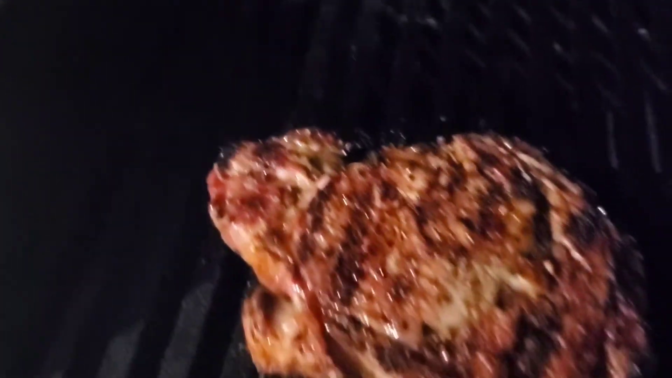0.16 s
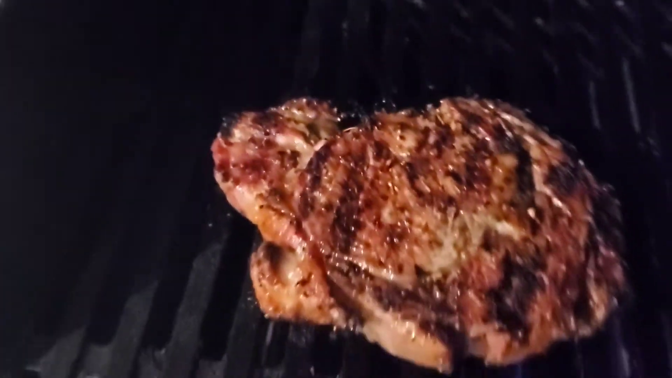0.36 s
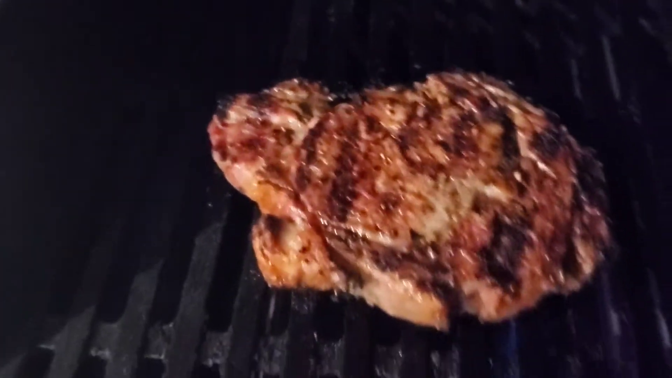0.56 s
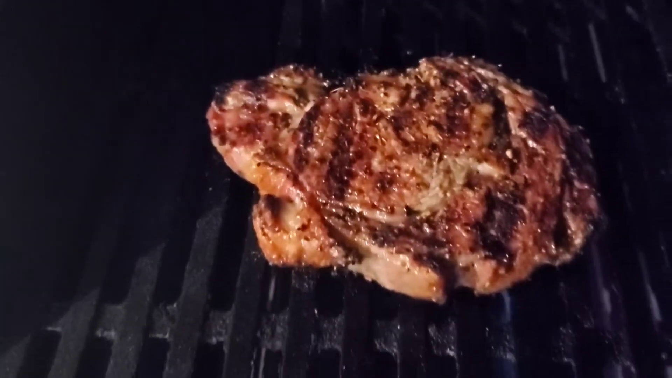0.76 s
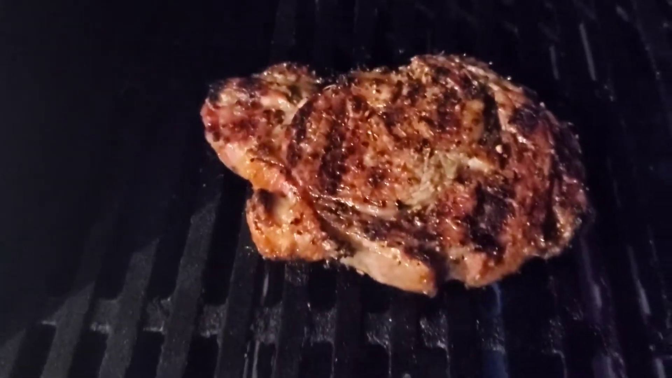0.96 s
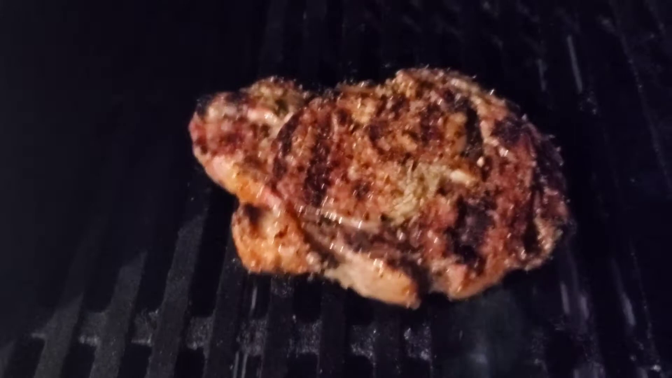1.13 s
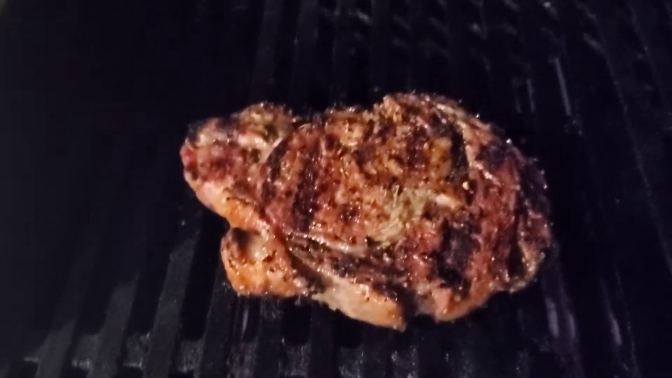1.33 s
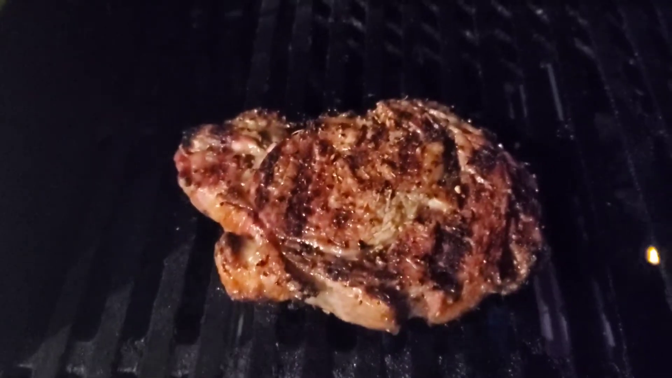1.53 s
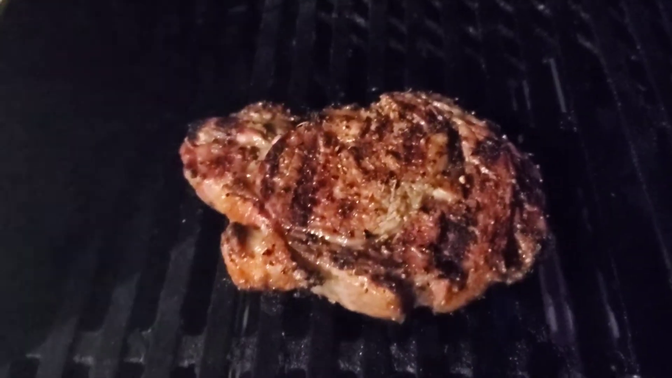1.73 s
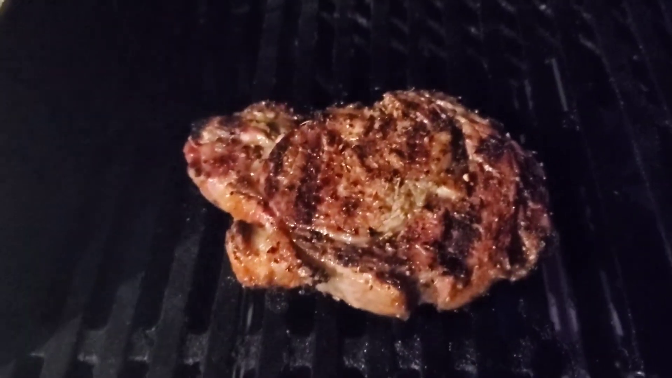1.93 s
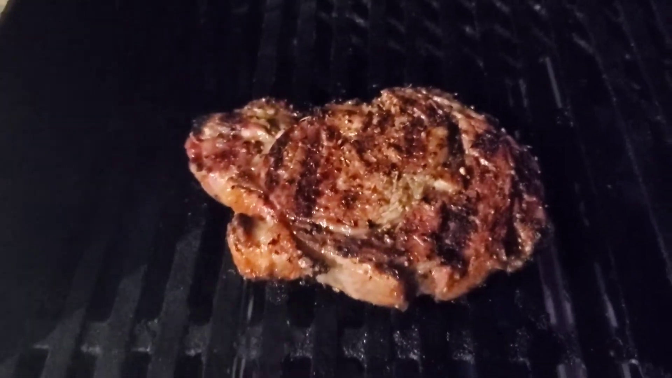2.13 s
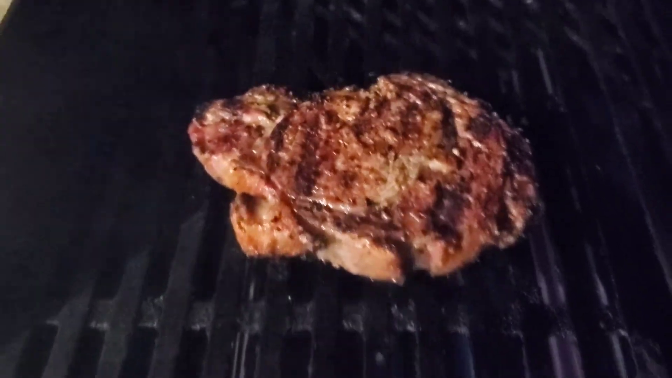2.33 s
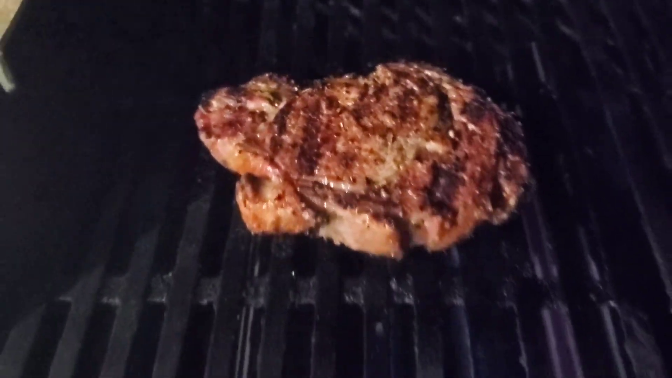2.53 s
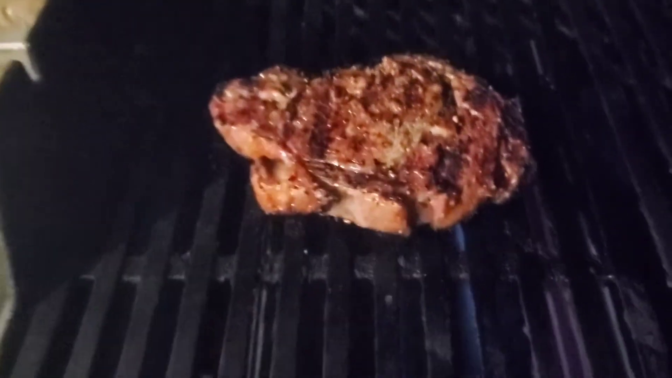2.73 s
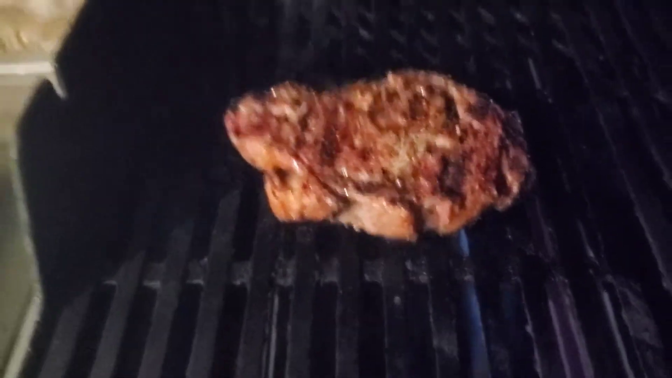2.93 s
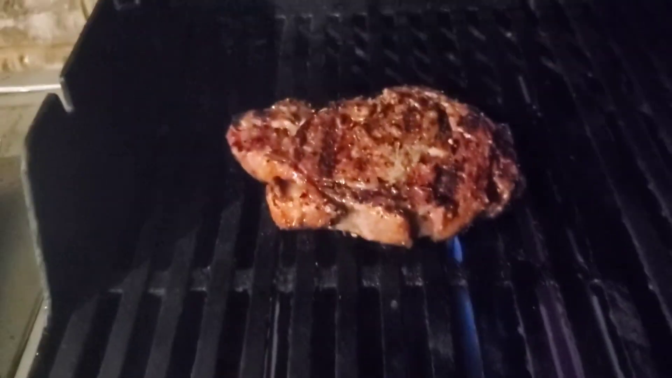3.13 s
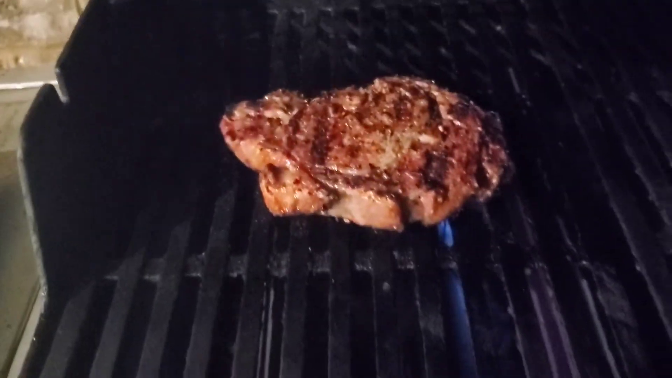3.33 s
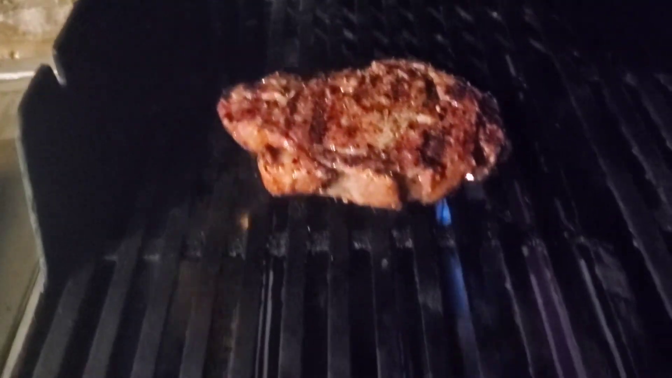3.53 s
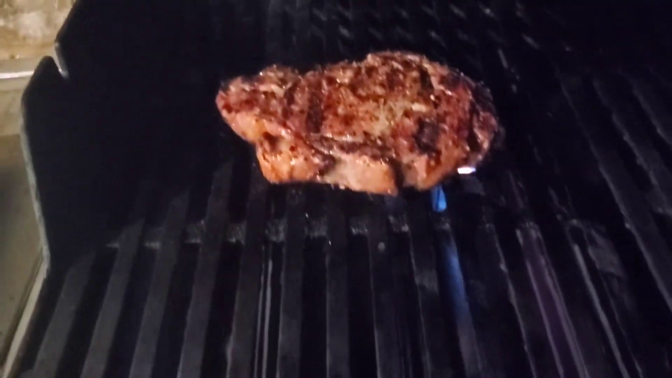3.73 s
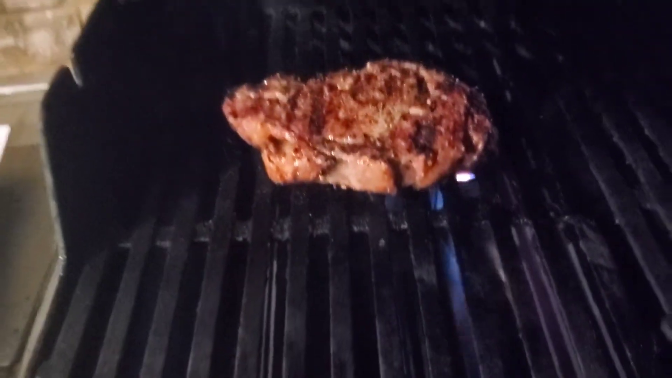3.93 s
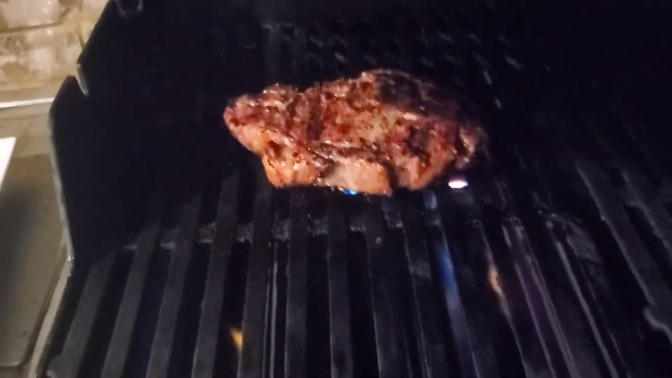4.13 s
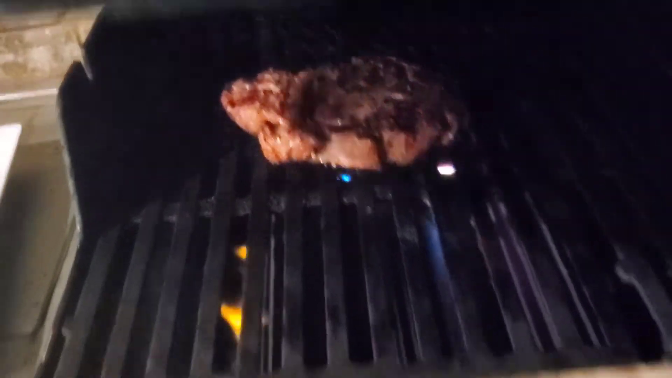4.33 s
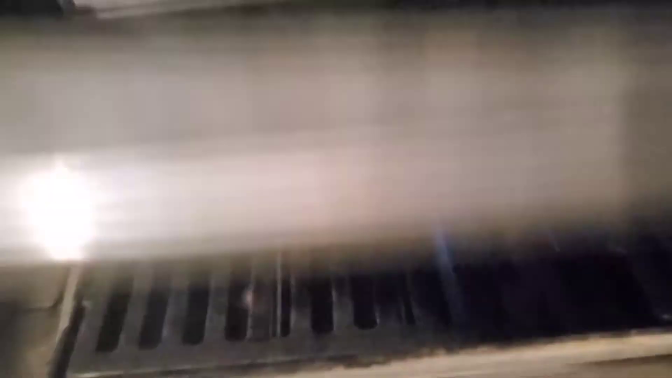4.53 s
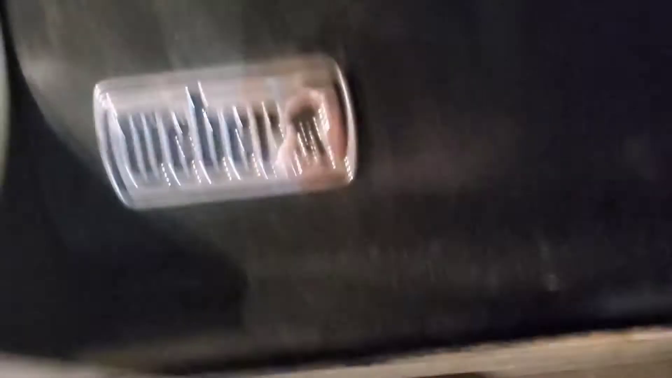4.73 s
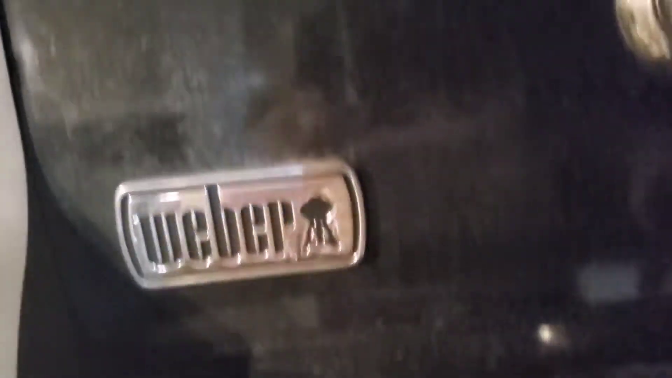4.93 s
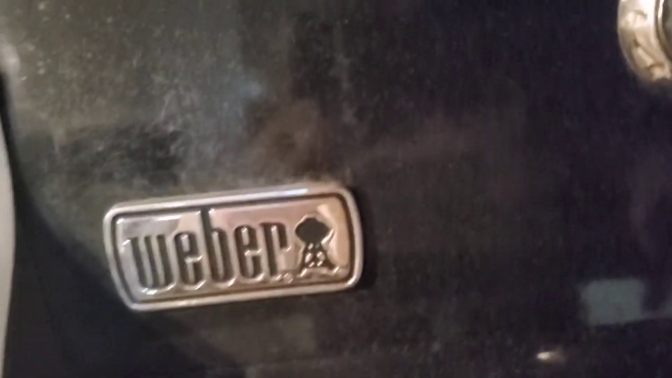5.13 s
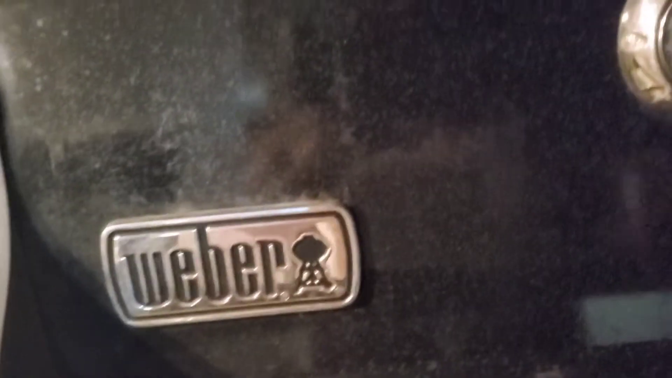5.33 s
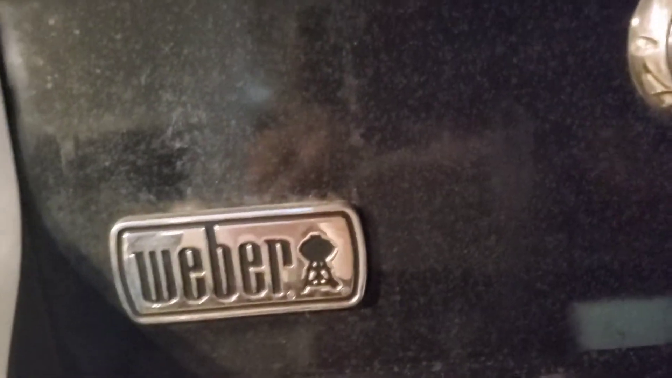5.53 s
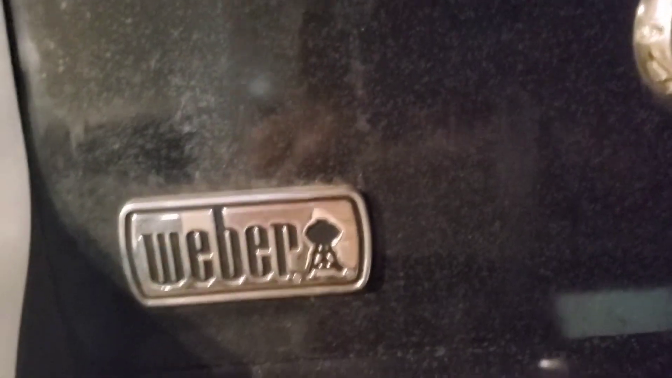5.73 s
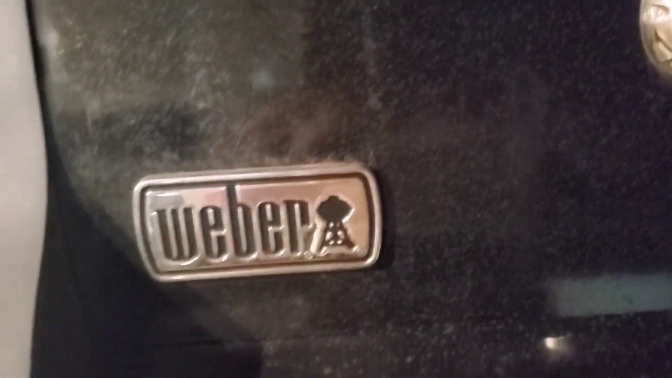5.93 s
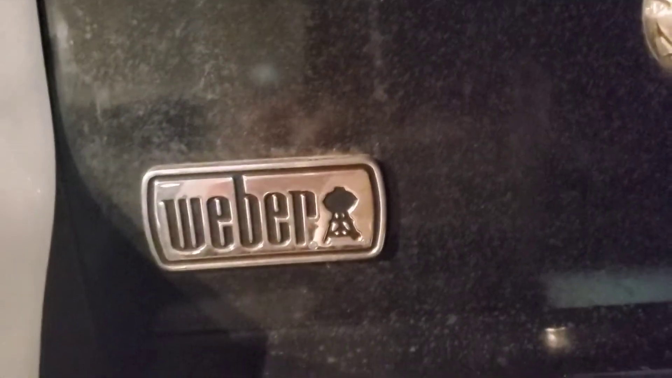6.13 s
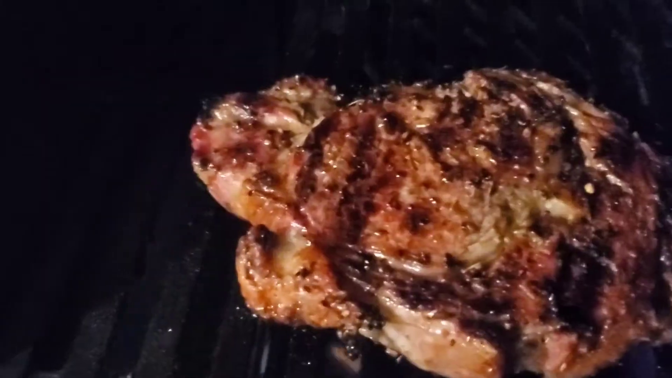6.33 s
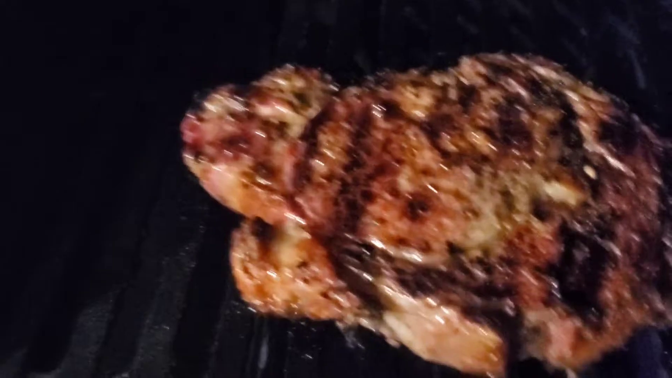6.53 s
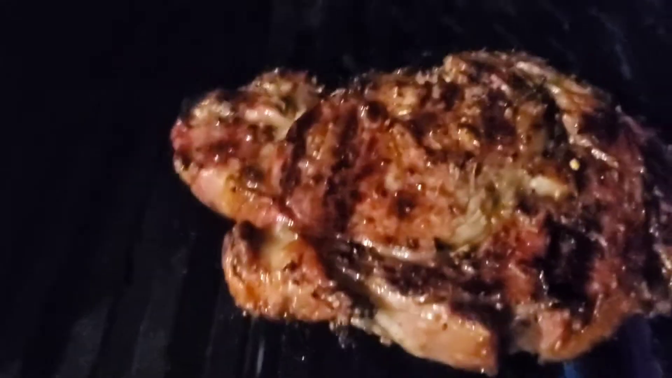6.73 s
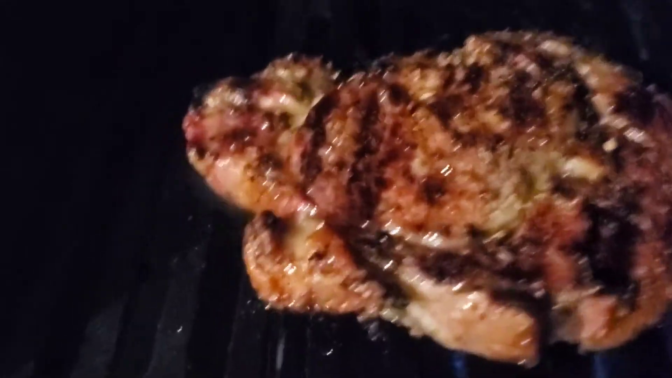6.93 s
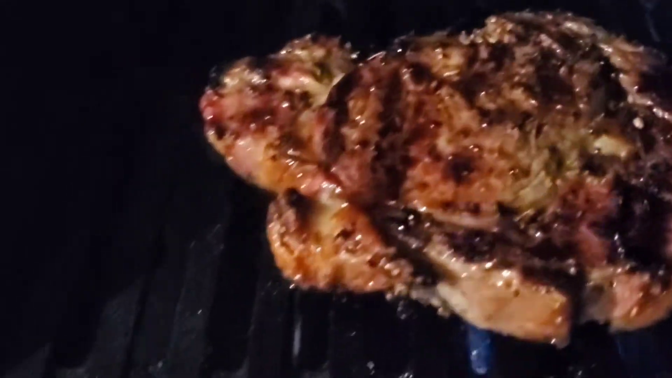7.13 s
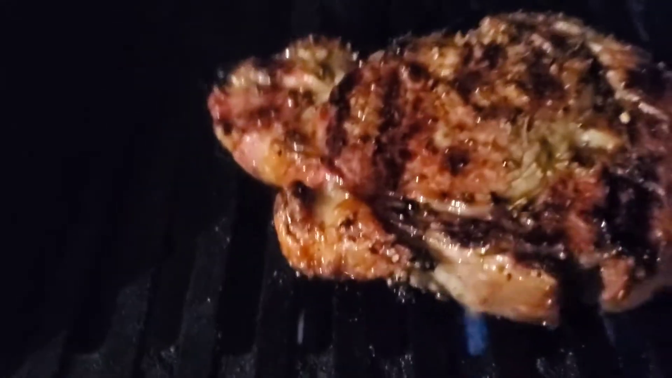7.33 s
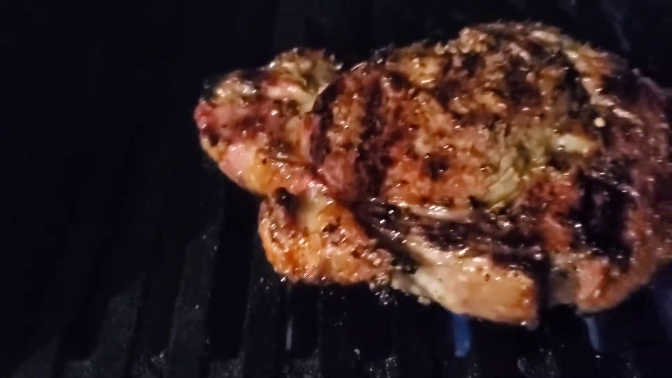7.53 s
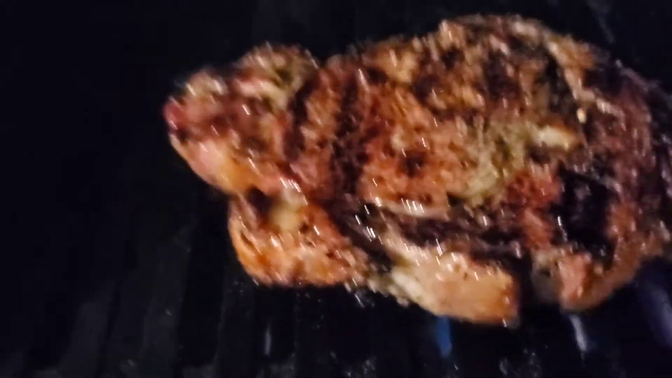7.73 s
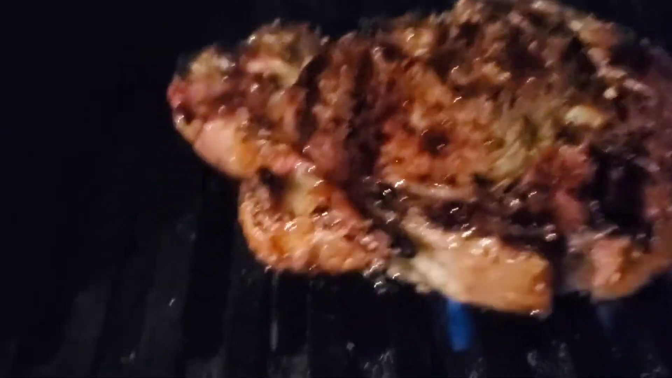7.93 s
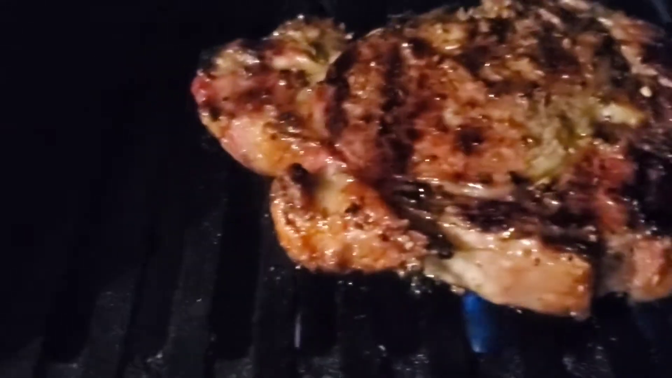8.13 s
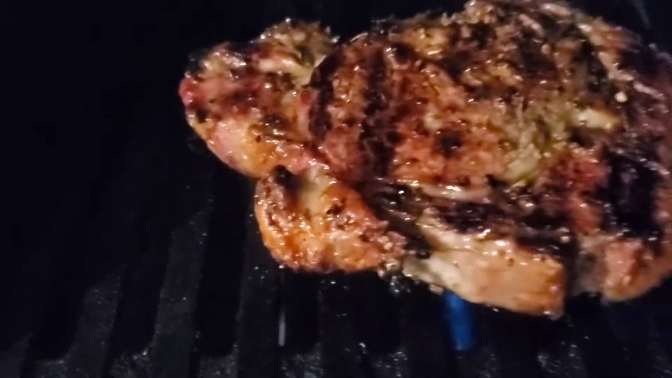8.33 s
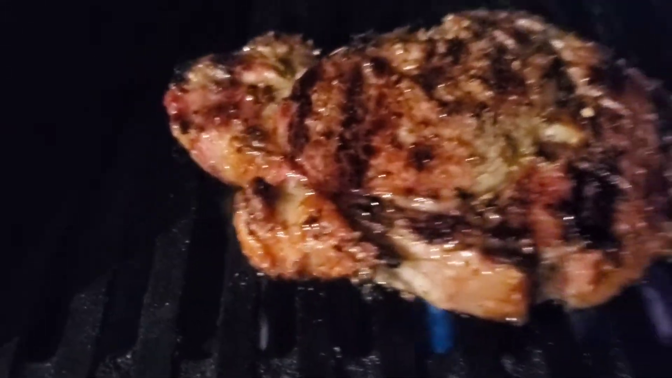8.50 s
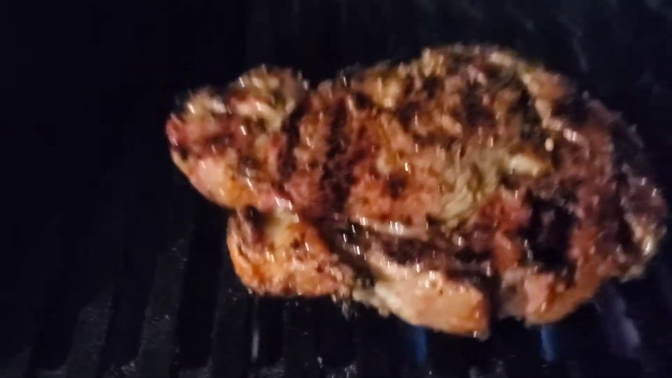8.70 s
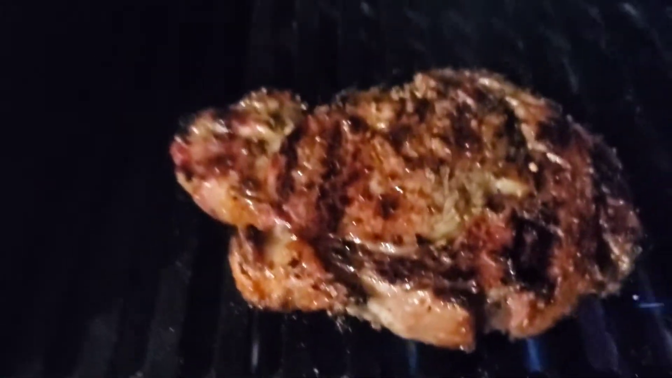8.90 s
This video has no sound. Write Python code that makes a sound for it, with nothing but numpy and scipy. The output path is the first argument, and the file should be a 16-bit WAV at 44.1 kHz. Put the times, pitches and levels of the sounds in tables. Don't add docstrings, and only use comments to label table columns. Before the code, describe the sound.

Crisp fat crackles over droning gas burners, a metal lid bangs and rattles, the sizzle goes faint, then returns nearer with tong scrapes.

```python
import sys
import numpy as np
from scipy import signal
from scipy.fft import rfft, irfft, next_fast_len
from scipy.io import wavfile
from scipy.ndimage import uniform_filter1d

SR = 44100
rng = np.random.default_rng(int(sys.argv[2]) if len(sys.argv) > 2 else 0)


def wav_record(signal):
    frames = np.transpose(np.atleast_2d(signal))
    bounded = np.clip(frames, -1, 1)
    quanta = np.round(bounded * 32767).astype(np.int16)
    wavfile.write(sys.argv[1], SR, quanta)


def decibels_to_gain(level_db):
    exponent = np.asarray(level_db, float) / 20
    return 10 ** exponent


N = 395136
T = np.arange(N) / SR
TOP_HZ = 15780
SILENCE_S = (6.151, 6.1915)

# time in [s], level in [dB].
HEAT = [(0, -32), (1.37, -32), (1.6, -32.5), (2.5, -33.5), (3.1, -34.5), (4.28, -36), (6.17, -33.5),
        (6.19, -33.5), (6.27, -29.5), (6.82, -30), (7.32, -31), (7.66, -31.5), (7.92, -33.5), (8.36, -31),
        (8.62, -32), (8.96, -32.5)]
# time in [s], shut share in [0-1].
SHUT = [
    (4.28, 0),
    (4.49, 0.13),
    (4.72, 0.65),
    (4.93, 0.63),
    (5.2, 0.98),
    (6.17, 1),
    (6.18, 0.02),
]
# far level re heat in [dB], near level re heat in [dB], change through the hood in [dB].
BUBBLES = [
    (-22.5, -26, -10.5),
    (-7, -8.5, -17),
    (0, 1, -19),
]


def level(x, db=0):
    return x * decibels_to_gain(db) / np.sqrt(np.mean(x ** 2))


def curves(spans):
    s, *columns = np.concatenate(spans).T
    return [np.interp(T, s, c) for c in columns]


def bumps(rows):
    return sum(db * np.exp(-((T - s) / half_s) ** 2) for s, db, half_s in rows)


def near():
    return T > np.mean(SILENCE_S)


def colour(x, lo_hz, hi_hz, shape=((1, 0), (2, 0)), skirt=0.19):
    size = next_fast_len(x.shape[-1])
    octave = np.log2(np.arange(size // 2 + 1) * SR / size + 1)
    edge = np.minimum(octave - np.log2(lo_hz), np.log2(hi_hz) - octave) / skirt
    passed = np.sin(np.pi / 4 * (1 + np.clip(edge, -1, 1)))
    hz, db = np.array(shape).T
    tint = decibels_to_gain(np.interp(octave, np.log2(hz), db))
    return irfft(rfft(x, size) * tint * passed, size)[..., :x.shape[-1]]


def ring(x, hz, t60_s):
    pole = np.exp(2j * np.pi * hz / SR - np.log(1000) / (t60_s * SR))
    return signal.lfilter([1], [1, -pole], x).imag


def walk(rate_hz):
    k = int(SR / rate_hz)
    held = np.repeat(rng.standard_normal(N // k + 1), k)
    steps = uniform_filter1d(uniform_filter1d(held, k), k)[:N]
    return level(steps - uniform_filter1d(steps, size=3 * k))


def pair(alike, size=N):
    mid, side = rng.standard_normal((2, size))
    alike = np.clip(alike, -1, 1)
    opposed = side * np.array([[1], [-1]])
    return (np.sqrt(1 + alike) * mid + np.sqrt(1 - alike) * opposed) / np.sqrt(2)


def pan(db):
    return decibels_to_gain(np.array([db, -db]) / 2)


def add(out, sound, s):
    i = int(s * SR)
    out[:, i:i + sound.shape[-1]] += sound[..., :N - i]


def sizzle():
    # frequency in [Hz], density in [dB per Hz].
    fat = [(290, -56), (500, -30), (586, -13.5), (804, -15), (970, -21.5), (1260, -12.5), (1430, -15),
           (2170, -17), (2730, -14.5), (4460, -14.5), (7070, -8.5), (9290, -9), (11500, 0), (14900, 4),
           (15600, 9)]
    # time in [s], bright change in [dB], deep change in [dB], half length in [s].
    surges = [(.26, 1, -3, 0.045), (0.335, -0.5, 7, 0.022), (.37, 1.5, -2, .02), (0.462, -1.5, -3.5, 0.051),
              (0.474, 3, 1, 0.0096), (0.684, -1.5, -2, 0.11), (0.712, 3, 2, 0.027), (1.606, -2, 1, 0.11),
              (1.698, 4, 1, 0.027), (1.78, -1, 6, 0.022), (2.56, 3, 4, 0.015), (2.596, -1.5, 1, 0.017),
              (2.69, 3.5, 4.5, .03), (3.14, -2, -1, 0.033), (3.212, -0.5, -1, 0.045), (3.315, 0.5, 3, 0.13),
              (3.544, 2.5, -0.5, 0.078), (5.95, 2.5, 4, .015), (6.274, 2.5, 7.5, 0.023),
              (7.446, 2.5, 6, 0.033), (7.74, 2.5, 9, 0.016), (6.513, -0.5, -2, 0.017), (6.704, 2, 1, .04),
              (6.948, 1, -3, .04), (6.999, -2, 0, 0.037), (7.09, 1.5, -1.5, 0.043), (8.33, 0, -1.5, 0.062),
              (8.49, -1, 3, 0.058), (8.546, -0.5, -0.5, .02), (8.603, 6, 5, 0.0094)]
    # time in [s], change in [dB], half length in [s].
    fizz = [(6.82, 7, .03), (6.95, 3.5, .03), (7.01, -4, .025), (7.1, 1, .05), (7.27, 4, .015),
            (7.4, 7, .03), (7.58, 1.5, .04), (7.67, 0, .03), (7.78, 1.5, .04), (7.91, -4, .04),
            (8.05, -6, .04), (8.3, 4, 0.066), (8.46, -1, .04), (8.55, 3, .02), (8.7, 0, .05)]
    # frequency in [Hz], change in [dB].
    muffle = [(800, 2), (1900, -3.5), (2700, 2), (3700, -1), (5000, 1.5), (8000, -0.5), (14000, -2)]
    # time in [s], finest fizz in [dB], the rest in [dB].
    lean = [(0, -2, 0.52), (1.54, 2, 0.93), (2.05, -3, 0.66), (2.87, 2.5, 0.4), (4.21, 1.5, 0.27),
            (4.57, -4, -1.1), (5.56, -2, 0.87), (6.14, -6, 0), (6.2, 2, 0), (6.86, 4, -0.84),
            (6.94, 11, .5), (7.6, 5, -0.16), (7.8, 13, 1), (8.05, -1, -1), (8.2, 0, -0.069),
            (8.96, -1, 0.29)]
    (heat_db,), (shut,) = curves([HEAT]), curves([SHUT])
    fizz_pan_db, body_pan_db = curves([lean])
    fizz_db = bumps(fizz)
    bright_db, deep_db = (bumps(np.array(surges)[:, [0, k, 3]]) for k in (1, 2))

    when, size, pitch = rng.random((6000, 3)).T
    start = (when * N).astype(int)
    flurry = .7 * walk(22) + .7 * walk(60)
    power = decibels_to_gain(2 * (0.83 * np.minimum(-np.log(size), 3.5) + 0.45 * flurry[start]))

    groups = [(deep_db, [670, 965, 1520, 2196], .6),
              (bright_db, [2413, 3000, 4382, 5600, 7270, 8340], .35),
              (bright_db, [8740, 10800, 14200, 15580], .3)]
    out = 0
    for (far_db, near_db, hood_db), (surge_db, edges_hz, steady) in zip(BUBBLES, groups):
        group = 0
        for lo, hi in zip(edges_hz, edges_hz[1:]):
            centre_hz = np.sqrt(lo * hi)
            reach = np.exp(-((np.log2(centre_hz / 1500) - 4.0 * pitch) / 1.6) ** 2)
            bursts = np.bincount(start, power * reach, N)
            bursts = signal.lfilter([1], [1, -np.exp(-1 / (0.0045 * SR))], bursts)
            bursts = bursts / uniform_filter1d(bursts, size=9000)
            swell = np.sqrt(steady + (1 - steady) * bursts) * decibels_to_gain(0.5 * walk(15) + 0.066 * flurry)
            finest = lo > 13000
            flare = 1 if finest else 0.45 * (lo > 10000)
            muffle_db = np.interp(centre_hz, *np.transpose(muffle)) * shut
            place = pan(fizz_pan_db if finest else body_pan_db) * decibels_to_gain(muffle_db + fizz_db * flare)
            group = group + colour(level(swell) * place * pair(250 / lo), lo, hi, fat)
        group_db = heat_db + surge_db + np.where(near(), near_db, far_db) + shut * hood_db
        out = out + level(group, 2.2) * decibels_to_gain(group_db)
    return out


def ticks():
    when, size, place = rng.random((700, 3)).T
    (heat_db,), (shut,) = curves([HEAT]), curves([SHUT])
    snap = decibels_to_gain(2.5 * np.minimum(-np.log(size), 3.5)) * pan(12.0 * (place - .5))
    clicks = np.array([np.bincount((when * N).astype(int), side, N) for side in snap])
    hood_db = BUBBLES[-1][-1]
    return colour(clicks, 12000, TOP_HZ, skirt=0.28) * decibels_to_gain(heat_db + 19 + shut * hood_db)


def burners():
    # time in [s], pitch in [Hz], level in [dB].
    jet_curve = [(0, 2750, -52.5), (4.2, 2900, -61), (4.55, 2930, -58), (4.75, 3160, -55),
                 (4.93, 3360, -61), (5.05, 2750, -64), (5.45, 2775, -66), (5.7, 2820, -58.5),
                 (5.85, 2746, -57.5), (6.15, 2880, -51), (6.2, 2800, -68), (8.96, 2800, -64)]
    # time in [s], level in [dB].
    flame = [(0, -53), (.66, -60), (1.66, -53), (2.16, -55), (2.55, -50.5), (3.09, -53), (3.51, -54),
             (4.68, -59), (5.33, -53), (5.67, -60.5), (6.17, -58.5), (6.38, -50), (6.76, -59), (7.6, -52.5),
             (8.1, -59.5), (8.5, -51.5), (8.96, -55.5)]
    # frequency in [Hz], density in [dB per Hz].
    roar_shape = [(62, -26), (105, 3), (113, 0), (231, -7), (289, -9.5), (350, -9), (448, -18.5),
                  (600, -19.5), (780, -46), (1320, -120)]
    roar_edges_hz = [100, 178, 284, 451, 720]
    # multiple of the pitch [1], level in [dB].
    hum_partials = [
        (1, 5),
        (3, -20.5),
        (5, -30.5),
    ]
    # time in [s], level over still air in [dB], half length in [s].
    gusts = [
        (.4, 18, 0.83),
        (1.2, 3, 0.17),
        (4.93, 4, 0.23),
        (6.4, 6, .25),
        (7.15, 12.5, 0.26),
        (7.98, 13.5, .2),
    ]
    (roar_db,), (shut,) = curves([flame]), curves([SHUT])
    jet_hz, jet_db = curves([jet_curve])

    whistle = np.sin(2 * np.pi * np.cumsum(jet_hz) / SR)
    jets = level(colour(pair(-0.29), 1, 144, skirt=1.8) * whistle, 1.1)
    jets = jets * pan(-2.2)[:, None] * decibels_to_gain(jet_db + 1.5 * walk(14))

    turn = 2 * np.pi * np.cumsum(79 + 0.58 * walk(3.7)) / SR
    hum = level(sum(decibels_to_gain(db) * np.sin(k * turn) for k, db in hum_partials), -2.8) * pan(-0.46)[:, None]
    box = ring(ring(pair(.6) * pan(1.5)[:, None], 79.0, 0.06), 73.0, 0.061)
    drone_db = np.where(near(), -56, -44) - 3.5 * shut ** 4 + bumps([(4.23, -3.5, 0.23)])
    drone = (hum + level(box, -9.5)) * decibels_to_gain(drone_db + 0.95 * walk(6.2))

    flicker = sum(colour(pair(1.0), lo, hi, roar_shape) * decibels_to_gain(2.16 * walk(9.0))
                  for lo, hi in zip(roar_edges_hz, roar_edges_hz[1:]))
    roar = level(flicker, 0.084) * decibels_to_gain(roar_db + 1.04 * walk(9.0) + 2.76 * walk(30))

    still_air_db = -68
    air = level(colour(pair(.5) * pan(-3)[:, None], 30, 78, skirt=0.45), 5.6)
    air = air * decibels_to_gain(still_air_db + bumps(gusts) + 5.2 * walk(17))
    return jets + drone + roar + air


def yard():
    # frequency in [Hz], density in [dB per Hz].
    yard_shape = [(180, -9), (300, -1), (450, -2), (700, 1.5), (1000, -9), (1500, -21)]
    return level(colour(pair(0.15), 155, 2100, yard_shape), -67) * decibels_to_gain(1.7 * walk(6.8))


def puffs():
    # time in [s], peak in [dB], pitch in [Hz].
    flame_puffs = [(0.397, -42.5, 241), (0.716, -41, 192), (1.306, -41, 134.8), (1.443, -39, 173),
                   (1.585, -31.5, 215), (1.716, -39, 206), (1.916, -40.5, 161), (2.113, -35.5, 170),
                   (2.265, -38, 197), (2.34, -45.5, 193.3), (2.738, -36.5, 178), (3.82, -38, 190.8),
                   (4.136, -36.5, 134), (6.08, -42, 235.5), (6.266, -36, 157), (6.271, -29, 315),
                   (6.38, -46, 200.6), (7.32, -36, 165.1), (7.33, -35, 320), (7.368, -42, 220),
                   (8.759, -38, 175), (8.881, -46, 120)]
    # time in [s], peak in [dB], pitch in [Hz].
    finger_bumps = [(0.159, -40, 83), (0.469, -37, 67.6), (0.559, -33, 67.6), (0.614, -34, 98),
                    (2.529, -32.5, 72.5), (3.339, -48, 83.4), (5.454, -40, 53.8), (7.138, -39, 66),
                    (8.049, -43, 45.8), (8.763, -40.5, 75)]
    out, t = np.zeros((2, N)), T[:5000]
    sag = t + 0.0014 * (1 - np.exp(-t / 0.0045))
    for rows, t60_s, pan_db in ((flame_puffs, 0.035, 0), (finger_bumps, 0.089, -5.0)):
        fade = (1 - np.exp(-t / 0.0076)) * decibels_to_gain(-60 * t / t60_s)
        for s, db, hz in rows:
            turn = 2 * np.pi * hz * sag
            thump = fade * (np.sin(turn) + 0.22 * np.sin(1.8 * turn) + 0.066 * np.sin(3.15 * turn))
            add(out, thump * decibels_to_gain(db) / np.abs(thump).max() * pan(pan_db)[:, None], s)
    return out


def spits():
    # time in [s], peak in [dB], middle band re peak in [dB], left minus right in [dB].
    far_spits = [(0.2389, -14, -22.5, 2.0), (0.3636, -20, -17, 0.5), (0.4708, -18, -13, -1.5),
                 (0.626, -25, -15, 1.5), (0.7043, -23, -16, -0.5), (0.9692, -20, -17, 0.5),
                 (1.3004, -18, -15, -0.5), (1.6945, -20, -14, -0.5), (1.7734, -15, -27, 3.5),
                 (1.8322, -20, -18, 0.0), (1.9505, -20, -18, -1.5), (2.0398, -23, -21, -2.0),
                 (2.0877, -19, -23, -1.5), (2.143, -9, -24, -1.5), (2.3965, -20, -19, 1.5),
                 (2.5377, -19, -19, 0.0), (2.6833, -23, -16, 1.5), (2.892, -18, -21, 3.0),
                 (2.94, -20, -19, -2.0), (3.5154, -14, -22, 1.0), (3.9644, -21, -17, 1.0),
                 (4.1365, -20, -19, 1.5)]
    near_spits = [(6.2483, -17, -11, 3.0), (6.4134, -20, -18, 3.5), (6.4743, -7, -13, -10),
                  (6.506, -19, -8, 2.5), (6.54, -19, -7.5, 3), (6.589, -12, -13, 0),
                  (6.6838, -14, -21, 1.0), (6.8095, -17, -18, 3), (6.832, -9, -14, 2),
                  (6.9207, -17, -19, 6.5), (7.0415, -18, -19, 3.5), (7.4106, -19, -18, 2.5),
                  (7.4435, -14, -18, 4.0), (7.5199, -12, -21, 4.0), (7.5443, -18, -18, 3.0),
                  (7.726, -11, -21, 13), (7.868, -16, -22, 6.5), (7.9943, -25, -16, -1.0),
                  (8.0986, -20, -18, -4.5), (8.2228, -16, -7.5, 0.0), (8.2687, -18, -20, 1.0),
                  (8.3106, -14, -21, -0.5), (8.5206, -12, -19, 2.5), (8.5421, -18, -18, 4.5),
                  (8.5962, -20, -6, -3), (8.6373, -16, -19, 0.0), (8.7591, -19, -20, -1.5),
                  (8.8045, -22, -20, 0.0), (8.8903, -12, -25, 1.0)]
    # same columns, then pitch in [Hz].
    pops = [
        (2.397, -18, -15, 1.5, 13000),
        (3.36, -21, -6, 0.0, 12000),
        (0.4695, -16.5, -9, 0.0, 11500),
        (8.099, -17.5, -15, -8, 10800),
        (8.5084, -20.5, -20, 0.0, 7800),
        (8.5963, -10.5, -11, 0.0, 7800),
    ]
    out, t = np.zeros((2, N)), T[:1300] - .001
    rows = far_spits + near_spits
    pitch_hz = 14300 * (1 + 0.043 * np.clip(rng.standard_normal(len(rows)), -2, 1))
    shape = (t >= 0) * (np.exp(-t / 0.0013) + 0.26 * np.exp(-t / 0.0095))
    for s, db, middle_db, pan_db, hz in pops + [(*row, hz) for row, hz in zip(rows, pitch_hz)]:
        top = colour(shape * pair(0, size=len(t)), 0.96 * hz, min(1.015 * hz, TOP_HZ))
        middle = colour(shape * pair(0, size=len(t)), 5300, 8200, skirt=0.63)
        crack = top / np.abs(top).max() + decibels_to_gain(middle_db + 5.5) * middle / np.abs(middle).max()
        loudest_db = -14
        add(out, crack * decibels_to_gain(min(db, loudest_db) + 2.5) * pan(pan_db)[:, None], s - .001)
    return out


def faint_tones():
    # time in [s], pitch in [Hz], length in [s], level in [dB].
    tones = [(5.6, 1060, 0.067, -64), (5.814, 1402, 0.13, -58.5), (5.856, 800, 0.12, -61),
             (1.097, 880, 0.073, -50), (7.875, 308, 0.096, -50.5), (8.72, 700, .1, -53),
             (7.95, 1560, 0.64, -58.5), (4.5, 410, .4, -64), (5.03, 1580, .09, -53), (8.382, 323, 0.18, -52)]
    out = np.zeros((2, N))
    for s, hz, length_s, db in tones:
        size = int(length_s * SR)
        add(out, level(ring(pair(0.81, size=size), hz, 0.11), db) * np.hanning(size), s)
    return out


def hood():
    # frequency in [Hz], level in [dB], t60 in [s].
    sheet = [(125.3, -6, 0.41), (165.7, 2, 0.26), (214, 2, 0.2), (279, -19, 0.24), (334, -4.5, 0.37),
             (424, -4.5, 0.2), (493, -2.5, 0.27), (623, -16, 0.6), (790, -4.5, 0.27), (890, -15, 0.31),
             (1023, -22, 0.33), (1174, -18, 0.16), (1567, -13, 1), (1793, -25, 0.24)]
    # frequency in [Hz], level in [dB], t60 in [s].
    loose = [(140, -4, 0.33), (350, 1.5, 0.27), (800, -8.5, 0.4), (1540, -15, 0.3), (2520, -15.5, 0.3),
             (4100, 0, 0.07), (6340, -11, 0.024), (11000, -15, 0.0274)]
    # time in [s], blow in [dB], contact in [ms], rattle in [dB], rattle brightness in [dB per octave].
    landings = [
        (4.937, -38, .4, -37, 3.5),
        (4.9403, -9.5, 1.1, -20, 0.5),
        (4.9425, -29, 0.69, -21.5, 1),
        (5.18, -25, 1.54, -40.5, -2),
        (5.224, -30, 3.0, -55, 1),
        (5.263, -43, 2.3, -53, -0.5),
    ]
    out, t = np.zeros((2, N)), T[:22050]
    for s, blow_db, contact_ms, rattle_db, bright_db in landings:
        push = np.sin(np.pi * np.minimum(t * 1000 / contact_ms, 1))
        push = push / push.sum()
        blow = 7.0 * ring(push, 304, 0.012)
        for (hz, db, t60_s), (flip, side) in zip(sheet, rng.standard_normal((len(sheet), 2))):
            place = pan(min(hz / 70, 7.0) * np.clip(side, -1.3, 1.3))[:, None]
            blow = blow + decibels_to_gain(db) * np.sign(flip + 0.79) * ring(push, hz, t60_s) * place
        rattle = 0
        for hz, db, t60_s in loose:
            band = level(colour(pair(250 / hz, size=len(t)), hz / 1.5, hz * 1.27, skirt=0.86))
            rattle = rattle + decibels_to_gain(db + bright_db * np.log2(hz / 1000) - 60 * t / t60_s) * band
        rattle = rattle * np.minimum(t / 0.001, 1)
        add(out, decibels_to_gain(blow_db - 7.5) * blow + decibels_to_gain(rattle_db) * rattle, s)
    return signal.sosfilt(signal.butter(2, 105, "high", fs=SR, output="sos"), out)


def ports(hz):
    return np.array([[decibels_to_gain(-3.0)], [-decibels_to_gain(-4.0)]]) if hz < 1650 else np.array([[1], [decibels_to_gain(-13)]])


def tool():
    # frequency in [Hz], level in [dB], t60 in [s].
    steel = [(1095, -14, 0.15), (1230, -21, 0.11), (1570, -17, 0.41), (1803, -5.5, 0.35), (2310, -14, 0.05),
             (2800, 3, 0.085), (3210, -12, 0.07), (3830, -10, 0.08), (4870, -11, 0.13), (5370, -12.5, 0.08),
             (5940, -13, 0.1), (10100, -9, .05), (13000, -10, .04), (14850, -14, .05)]
    # time in [s], level in [dB], chatter in [s], share of the full t60 [1], contrast between
    clinks = [
        (7.4289, -22, 0.005, 0.47, 0.45),
        (7.476, -29.5, 0.0085, 0.44, 0.42),
        (7.7252, -19, 0.0034, 1, 0.99),
    ]
    # start in [s], length in [s], level in [dB].
    strokes = [
        (7.42, 0.084, -46),
        (7.599, 0.11, -45.5),
    ]
    # frequency in [Hz], width in [Hz], level in [dB].
    drag_out = [(1780, 42, 4), (2140, 67, 3), (2800, 57, -0.5), (3150, 90, 0), (3680, 36, -3),
                (4930, 35, -5)]
    drag_back = [(1269, 40, 0.5), (1828, 24, -5), (2326, 37, 6.5), (2820, 28, 1), (3340, 69, 0),
                 (3740, 30, -3), (4720, 240, -10)]
    out, t, u = np.zeros((2, N)), T[:9000], T[:7500]
    chatter_db = 1.7 * walk(40)
    bite_s, lift_db_per_s = 0.023, 320
    for (start_s, length_s, stroke_db), modes in zip(strokes, (drag_out, drag_back)):
        lift_db = lift_db_per_s * np.maximum(u - length_s, 0)
        rough_db = chatter_db[int(start_s * SR):][:7500]
        pressure = np.minimum(u / bite_s, 1) ** 2 * decibels_to_gain(stroke_db - lift_db + rough_db)
        grit = pair(0.52, size=7500) * rng.exponential(size=7500)
        drag = sum(level(ring(grit, hz, 2.3 / max(width_hz, 35)), db) * ports(hz) for hz, width_hz, db in modes)
        add(out, level(drag) * pressure, start_s)
    for s, db, chatter_s, ring_share, contrast in clinks:
        tap = pair(0.61, size=len(t)) * np.exp(-t / chatter_s)
        clink = 0
        for hz, mode_db, t60_s in steel:
            mode = ring(tap, hz, t60_s * ring_share)
            mode = mode / np.abs(mode).max(axis=1, keepdims=True)
            clink = clink + decibels_to_gain(contrast * mode_db) * ports(hz) * mode
        add(out, clink * decibels_to_gain(db) / np.abs(clink).max(), s)
    return colour(out, 985, TOP_HZ, skirt=0.089) * decibels_to_gain(7.5)


def scene():
    return sizzle() + ticks() + burners() + yard() + puffs() + spits() + faint_tones() + hood() + tool()


def band_limit(x):
    return signal.sosfilt(signal.butter(12, 16350, fs=SR, output="sos"), x)


def record(dry):
    stop_s, start_s = SILENCE_S
    gate = np.clip(np.maximum((stop_s - T) / 0.0026, (T - start_s) / 0.0021), 0, 1)
    mix = colour(np.clip(dry * gate, -.98, .98), 12, TOP_HZ, skirt=.012)
    return band_limit(mix)


dry = scene()
out = record(dry)
wav_record(out)
```